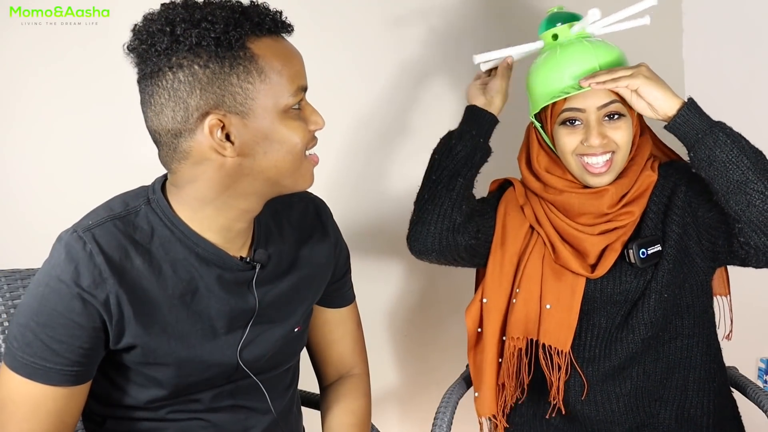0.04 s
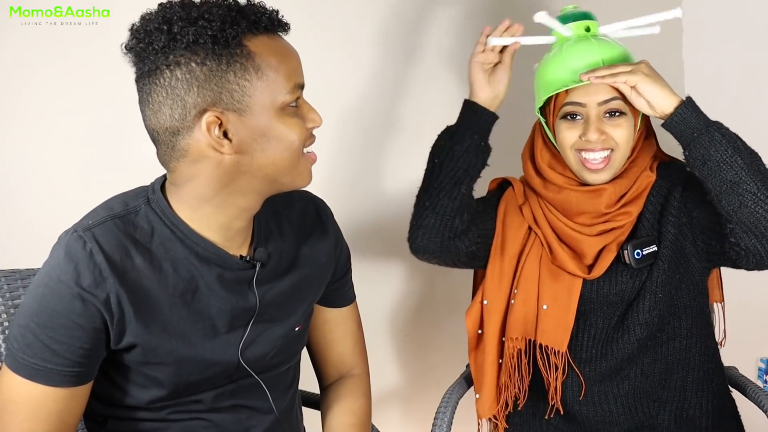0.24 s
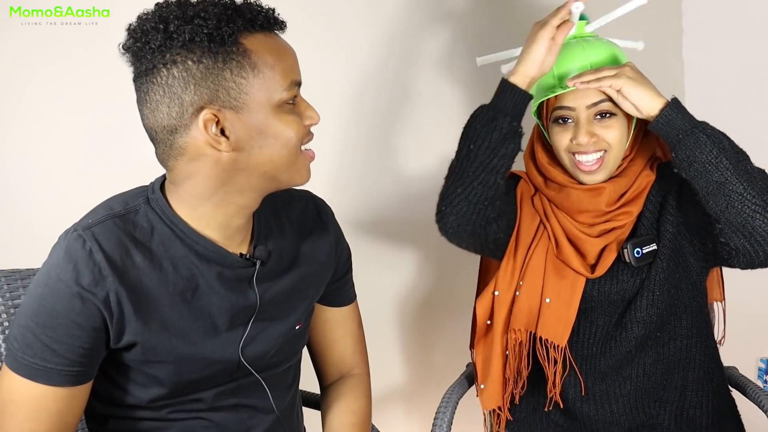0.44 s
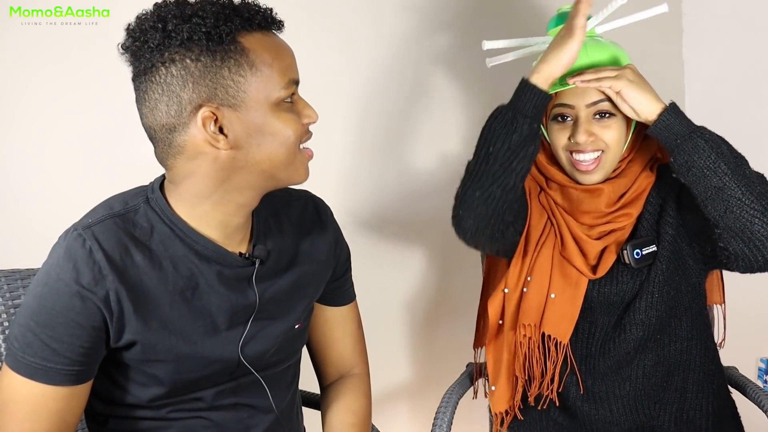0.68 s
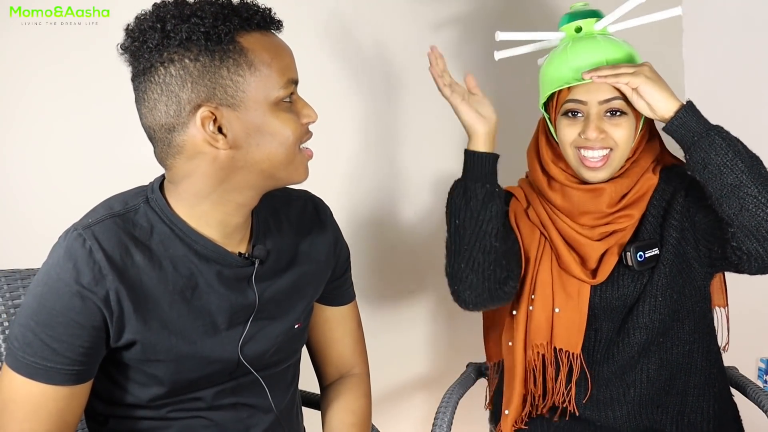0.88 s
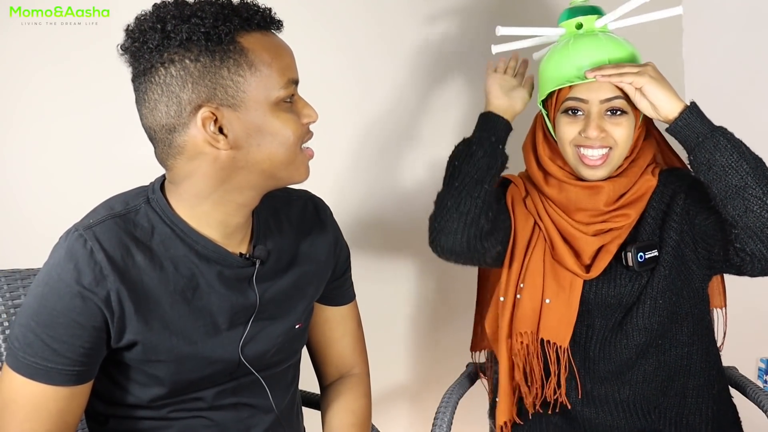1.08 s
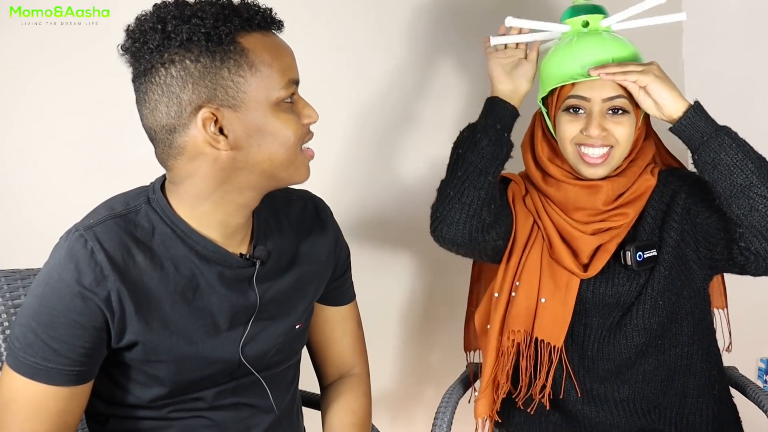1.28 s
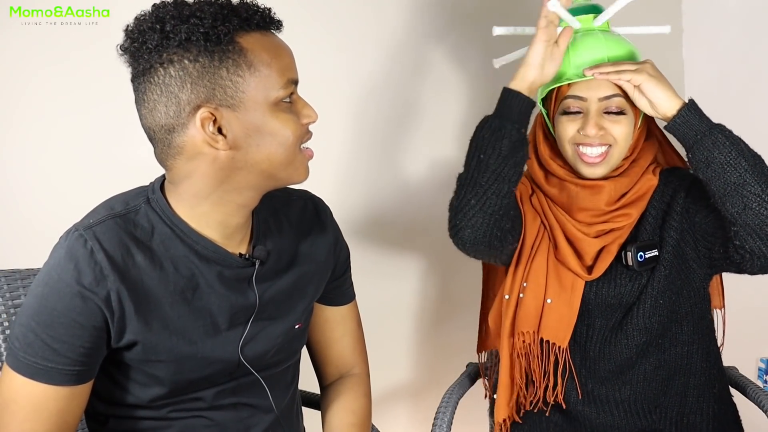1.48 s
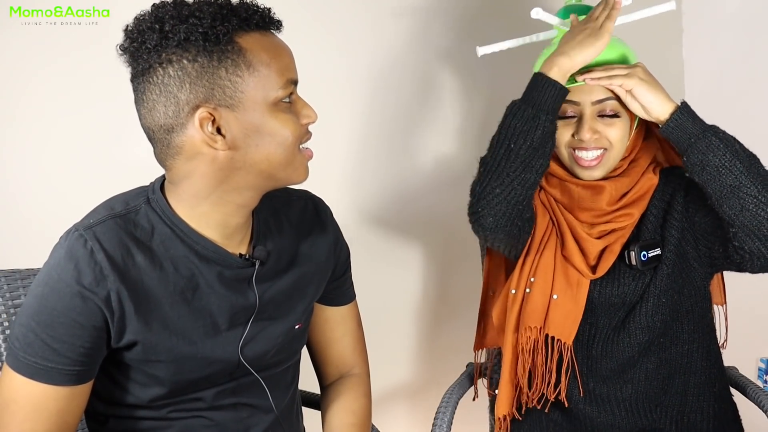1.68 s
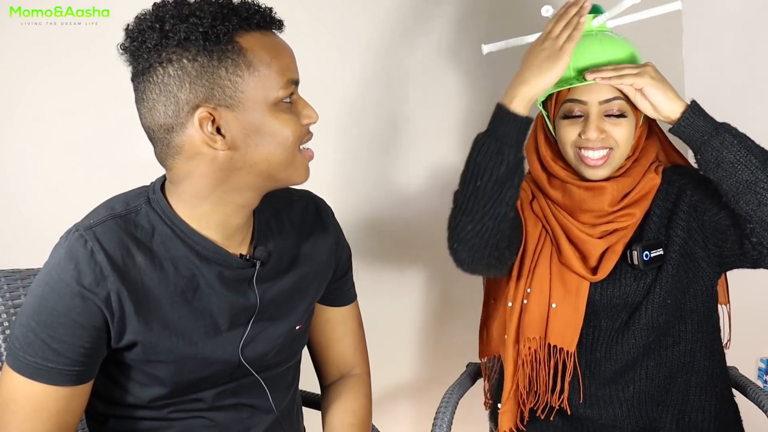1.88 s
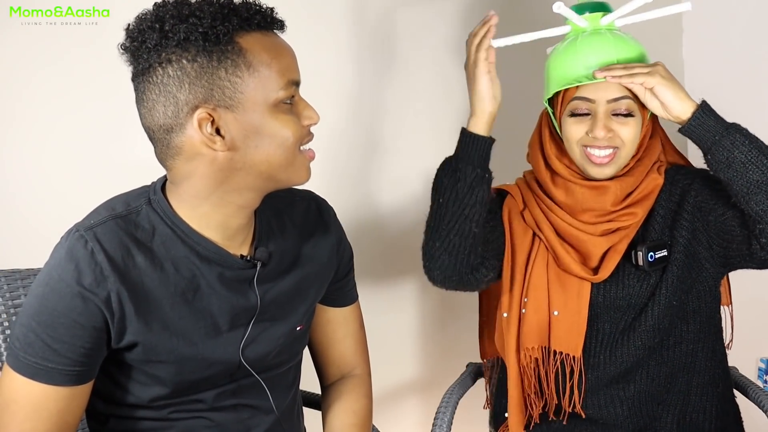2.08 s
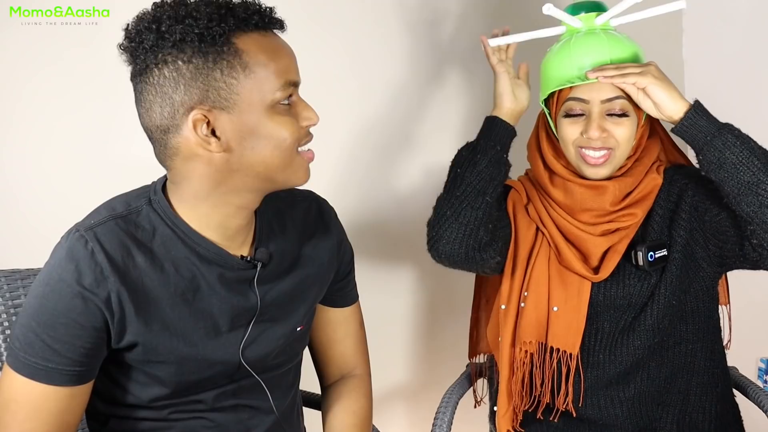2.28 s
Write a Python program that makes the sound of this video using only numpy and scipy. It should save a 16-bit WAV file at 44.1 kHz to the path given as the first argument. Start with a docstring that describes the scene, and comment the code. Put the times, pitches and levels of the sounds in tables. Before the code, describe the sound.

A plastic ratchet on a toy helmet is twisted twice, close by in a small, hard room. After light handling ticks, sharp clicks run from 0.2 to 0.7 seconds, quickening midway, with hollow thuds from the shell. Following a pause, a louder burst runs from 1.4 to 1.85 seconds, with one heavy thud near 1.6. A few last ticks come around 2 seconds, over a faint room rumble.

```python
"""A small, hard room, one microphone within reach of a toy helmet whose plastic ratchet is twisted twice.
Over a faint rumble, light ticks come as the fingers take hold. From 0.2 to 0.7 s the pawl snaps over the
teeth, faster in mid-twist, and the hollow shell thuds as the rotor rocks on it. After a pause and a few
more ticks, a louder twist runs from 1.4 to 1.85 s, with one heavy thud partway through. Near 2 s the
fingers let go with the last ticks, and the ring of room and shell dies away."""
import sys
import numpy as np
from scipy import signal
from scipy.fft import rfft, irfft, dct
from scipy.io import wavfile

SR = 44100
rng = np.random.default_rng(int(sys.argv[2]) if len(sys.argv) > 2 else 0)


def master_out(mix):
    """Clip the mix to full scale and print it as 16-bit PCM to the path in sys.argv[1]."""
    frames = np.transpose(np.atleast_2d(mix))
    ceiling = np.clip(frames, -1, 1)
    pcm = np.round(ceiling * 32767).astype(np.int16)
    wavfile.write(sys.argv[1], SR, pcm)


N = 103017

# Pawl snaps, one per tooth: (time [s], crack level [dB], scrape level [dB],
# first mode [Hz], its level [dB], second mode [Hz], its level [dB])
SNAPS = [(0.1853, 2, -3.5, 2270, -1.5, 3600, -2), (0.2345, -3.5, -6, 2380, -14, 3445, -6),
         (0.283, -5, -16, 3330, -11.5, 4200, -9.5), (0.3287, -3, -9, 2400, -9, 5200, -13.5),
         (0.3627, -4, -10, 2330, -15, 3490, -10), (0.3936, -7.5, -12, 2050, -2.5, 2800, -3),
         (.422, -4, -5, 2080, -3.5, 2650, -19.5), (0.4468, -5, -7.5, 1740, -7, 2280, -15),
         (.473, -3.5, -1.5, 1696, -11, 4100, -13.5), (0.4952, -1.5, -9.5, 2136, -24, 2820, -14.5),
         (0.5199, -1.5, -6, 3445, -32.5, 4200, -15.5), (0.5468, -1, -1.5, 3600, -9.5, 6300, -13.5),
         (0.5777, -1, -2, 3460, -5.5, 4220, -2.5), (.616, 2.5, -2, 2420, 7, 3100, 4),
         (.6591, 5, -2, 2120, 2.5, 4750, 0.5), (0.713, 6, -0.5, 3447, 5.5, 4600, 3.5),
         (1.4395, 2.5, 1, 2210, 0, 3370, 1), (1.504, 5.5, 1.5, 3390, 4, 9000, -3),
         (1.5341, 5.5, 2.5, 1680, -0.5, 3570, -5.5), (1.559, 6, 0.5, 2480, 1, 3400, -10),
         (1.5789, 1.5, 1, 2900, 2, 3445, 3), (1.5967, 0.5, -7, 2800, 2, 3500, -7),
         (1.6163, 3, -3, 3030, 3, 3450, 0), (1.6412, 5, -0.5, 2420, 7, 3800, -3),
         (1.6735, 5, 0, 2400, 4, 3950, -4), (1.7134, 5, 0.5, 2460, 6, 4750, -0.5),
         (1.7542, 6.5, 3, 2510, -8.5, 3450, -12.5), (1.797, 4.5, 0.5, 4880, 3, 8100, 2),
         (1.8479, 5, 1.5, 2280, -4, 5300, 4)]
# Spectrum of the pawl landing: (frequency [Hz], relative level [dB])
CRACK_SPECTRUM = [(150, -34.5), (500, -21.5), (1000, -16), (1450, -7.5), (2150, 1), (2800, -2.5), (3400, 2),
                  (4300, -2.5), (5200, -7), (6800, -11), (9000, -27), (16000, -37)]
# Spectrum of its tip scraping off a tooth: (frequency [Hz], relative level [dB])
SCRAPE_SPECTRUM = [(3000, -29), (6000, -5.5), (7200, -3.5), (8500, 2), (10800, -2.5), (12300, -1.5),
                   (14200, -3.5), (16000, -24.5)]
# Blows of the rotor on the shell: (time [s], thud level [dB], knock level [dB])
SHELL_BLOWS = [(.190, -12, -28), (0.236, -13.5, -31), (0.296, -10.5, -18), (0.338, -8.5, -12),
               (.374, -7.5, -15.5), (.401, -9, -13), (0.429, -9.5, -12), (0.45, -9.5, -14),
               (0.475, -4.5, -10.5), (.498, -18.5, -15.5), (.541, -10, -11), (0.576, -20, -16.5),
               (0.611, -20.5, -16), (1.328, -27, -30), (1.442, -27.5, -20.5), (1.504, -18, -17),
               (1.536, -11.5, -15.5), (1.5805, 3, 2), (1.598, -7, -14), (1.715, -27.5, -20.5),
               (1.755, -19.5, -15), (1.799, -30, -13), (1.849, -28, -16), (1.976, -30.5, -20)]
# Spectrum of the shell's dull thud: (frequency [Hz], relative level [dB])
THUD_SPECTRUM = [(30, -12.5), (75, -3), (110, -9.5), (160, -1.5), (200, 1.5), (290, 1), (480, -7),
                 (700, -13.5), (1000, -15), (3000, -46.5), (8000, -64)]
# Spectrum of its hollow knock: (frequency [Hz], relative level [dB])
KNOCK_SPECTRUM = [(100, -7.5), (350, -23), (520, 1), (850, -11), (1100, -2.5), (1500, -3), (2200, -18.5),
                  (4000, -30), (12000, -49.5)]
# Low resonances left ringing by a thud: (frequency [Hz], level [dB], time to fall 60 dB [s])
LOW_RESONANCES = [(193.2, -7.5, .45), (279.8, -7, 0.58), (338.7, -12, 0.23), (398, -23, 0.25),
                  (460, -10.5, .35), (534, -11, .35), (666, -16.5, .3), (835, -11.5, 0.35)]
# Ticks of plastic in the fingers: (time [s], level [dB])
FINGER_TICKS = [(0.09, -19), (0.1055, -20), (0.1238, -16), (0.1367, -20), (0.1512, -21), (0.17, -21),
                (1.3258, -26.5), (1.3346, -34.5), (1.3826, -23), (1.976, -22), (2.014, -18), (2.095, -27.5)]
# Spectrum of a tick: (frequency [Hz], relative level [dB])
TICK_SPECTRUM = [(150, -23.5), (600, -6), (1200, 0), (1900, -7), (2600, -4), (3300, 2), (3900, -7.5),
                 (4700, -17.5), (8000, -23.5), (16000, -23)]
# Near reflections reaching the microphone: (delay [s], level [dB])
REFLECTIONS = [(.0048, -17), (.0084, -17), (.0099, -18.5), (0.018, -32), (0.026, -31.5)]
# Diffuse tail of the room, with the helmet shell's long ring near 2-2.5 kHz:
# (frequency [Hz], level [dB], time to fall 60 dB [s])
ROOM_AND_SHELL_TAIL = [(99, -8, 0.13), (500, 5, .42), (1400, -4.5, .46), (2050, 1, 0.45), (2560, -2, 0.6),
                       (2610, -3, 0.37), (3500, -6.5, 0.48), (5400, -1, 0.46), (7860, -2.5, 0.44),
                       (12400, -6, .33), (16000, -4.5, 0.31)]
# Room tone: (frequency [Hz], relative spectral density [dB])
ROOM_TONE = [(15, -23), (38, 0), (65, -2.5), (110, -9.5), (220, -9), (600, -15), (1500, -19.5),
             (4000, -25.5), (11000, -29), (16000, -29)]

SCRAPE_LEAD_S = 0.0005  # the tip scrapes off the tooth just before it lands
TAIL_SAMPLES, TAIL_ONSET_S = 22000, 0.002
ROOM_TONE_DB = -58


def pawl_snap(crack_db, scrape_db, first_hz, first_db, second_hz, second_db):
    """The pawl passes one tooth: a bright scrape, then a sharp crack with two plastic modes."""
    out = amp(scrape_db) * struck_plastic(SCRAPE_SPECTRUM, rise_s=0.00091, fall_s=0.0028)
    crack = struck_plastic(CRACK_SPECTRUM, rise_s=0.00069, fall_s=0.0038)
    ring = amp(first_db) * plastic_mode(first_hz, crack)
    ring += amp(second_db) * plastic_mode(second_hz, crack)
    response = room_and_shell(np.ones(1), wet_db=-8)
    add(out, SCRAPE_LEAD_S, amp(crack_db) * crack)
    add(out, SCRAPE_LEAD_S, signal.fftconvolve(ring, response))
    return out


def plastic_mode(hz, crack):
    """One briefly ringing mode, in quadrature with the crack so that the two never cancel."""
    envelope = strike(rise_s=0.0008, fall_s=0.0025)
    phasor = envelope * np.exp(2j * np.pi * hz * np.arange(len(envelope)) / SR)
    crack_phase = np.angle(np.sum(phasor * crack[:len(phasor)]))
    return unit((phasor * np.exp(-1j * crack_phase)).imag)


def struck_plastic(spectrum, rise_s, fall_s, wet_db=0):
    """Dense, heavily damped modes of plastic, different at each blow, heard in the room."""
    envelope, taps = strike(rise_s, fall_s), colour(spectrum)
    blow = envelope * rng.standard_normal(len(envelope))
    blow /= np.linalg.norm(signal.fftconvolve(blow, taps))  # direct sound has energy 1 once coloured
    return signal.fftconvolve(room_and_shell(blow, wet_db), taps)


def strike(rise_s, fall_s, size=2048):
    """Envelope of a blow: a quick swell, then exponential decay."""
    t = np.arange(size) / SR
    return np.minimum(t / rise_s, 1) * np.exp(-np.maximum(t - rise_s, 0) / fall_s)


def shell_thuds():
    """The rotor rocks on the hollow shell: dull thuds, each with a low ring and a knock."""
    out, t = np.zeros(N), np.arange(TAIL_SAMPLES) / SR
    modes = [amp(db) * np.sqrt(2) * unit(amp(-60 * t / t60)) * np.exp(2j * np.pi * hz * t)
             for hz, db, t60 in LOW_RESONANCES]
    for s, thud_db, knock_db in SHELL_BLOWS:
        thud = struck_plastic(THUD_SPECTRUM, rise_s=0.0013, fall_s=0.006)
        ring = sum(mode * np.exp(2j * np.pi * rng.random()) for mode in modes).real
        knock = struck_plastic(KNOCK_SPECTRUM, rise_s=0.0013, fall_s=0.0045)
        add(out, s, amp(thud_db) * thud)
        add(out, s, amp(thud_db) * ring)
        add(out, s, amp(knock_db) * knock)
    return out


def finger_tick():
    """Plastic ticks lightly as the fingers take hold or let go."""
    return struck_plastic(TICK_SPECTRUM, rise_s=0.0005, fall_s=0.0016, wet_db=-0.5)


def room_and_shell(sound, wet_db=0):
    """At the microphone: direct sound, near reflections and a noise tail of room and ringing shell."""
    frame = 256  # samples per time step, and number of bands
    t = np.arange(TAIL_SAMPLES // frame) * frame / SR
    hz = (np.arange(frame) + 0.5) * SR / (2 * frame)
    decay_rate = np.log(1000) / curve(ROOM_AND_SHELL_TAIL, hz, column=2)
    start_gain = amp(wet_db + curve(ROOM_AND_SHELL_TAIL, hz)) * np.sqrt(2 * decay_rate / SR)
    gain = start_gain * np.exp(-t[:, None] * decay_rate)
    band_noise = gain * rng.standard_normal(gain.shape)
    out = dct(band_noise, type=4, norm="ortho").ravel()  # bands to waveform
    out *= np.minimum(np.arange(len(out)) / SR / TAIL_ONSET_S, 1)
    add(out, 0, sound)
    for delay, db in REFLECTIONS:
        add(out, delay, amp(db) * sound)
    return out


def room_tone():
    """Steady room rumble and faint hiss."""
    gain = amp(curve(ROOM_TONE, np.fft.rfftfreq(N, 1 / SR)))
    noise = irfft(rfft(rng.standard_normal(N)) * gain, N)
    return amp(ROOM_TONE_DB) * np.sqrt(N) * unit(noise)


def colour(spectrum, size=1024):
    """Taps of a causal filter with the given spectrum, energy 1."""
    hz = abs(np.fft.fftfreq(size, 1 / SR))
    log_gain = np.log(amp(curve(spectrum, hz)))
    minimum_phase = np.exp(np.conj(signal.hilbert(log_gain)))
    return unit(np.fft.ifft(minimum_phase).real)


def curve(points, hz, column=1):
    """One column of a table, interpolated on a log-frequency axis."""
    table = np.transpose(points)
    return np.interp(np.log(hz + 1), np.log(table[0]), table[column])


def amp(db):
    """Decibels to gain."""
    return 10 ** (np.asarray(db) / 20)


def unit(x):
    """Scales a sound to energy 1."""
    return x / np.sqrt(np.sum(x ** 2) + 1e-20)


def add(mix, s, sound):
    """Mixes a sound in at time s."""
    part = mix[max(round(s * SR), 0):][:len(sound)]
    part += sound[:len(part)]


def scene():
    """Snaps, thuds and ticks over the room tone, in mono at the microphone."""
    mix = room_tone() + shell_thuds()
    for s, *snap in SNAPS:
        add(mix, s - SCRAPE_LEAD_S, pawl_snap(*snap))
    for s, db in FINGER_TICKS:
        add(mix, s, amp(db) * finger_tick())
    return mix[None]


def record(dry):
    """The microphone signal clips at full scale, then is low-passed at 15.8 kHz."""
    low_pass = signal.firwin(255, 15800, window=("kaiser", 8), fs=SR)
    return signal.oaconvolve(np.clip(dry, -1, 1), low_pass[None], "same")


dry = scene()
out = record(dry)
master_out(out)
```